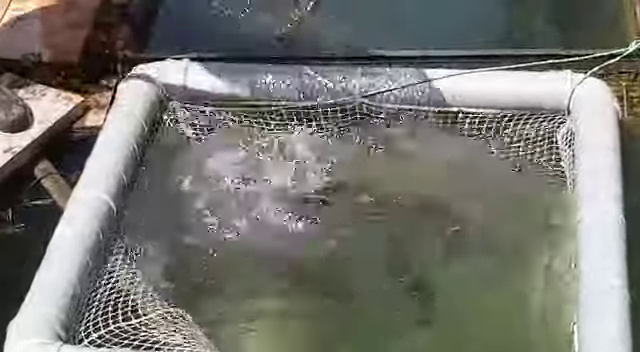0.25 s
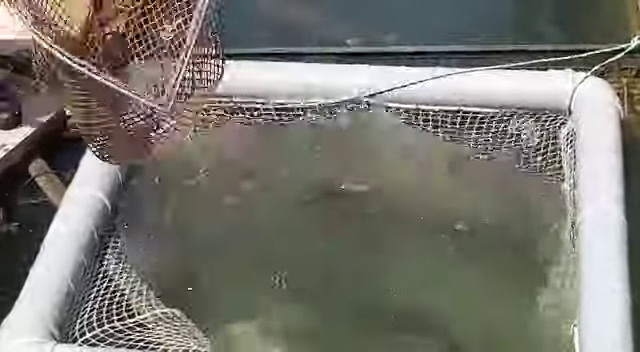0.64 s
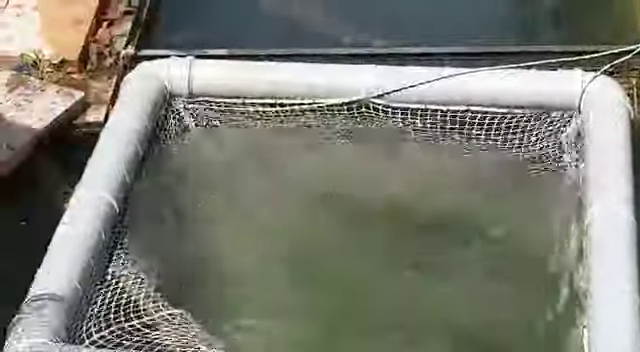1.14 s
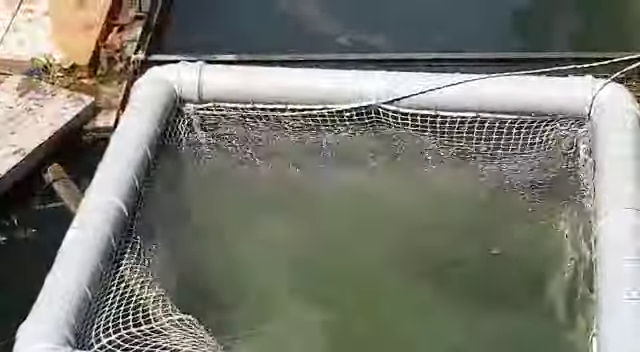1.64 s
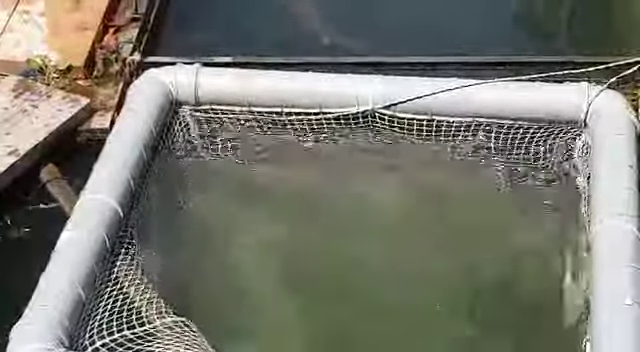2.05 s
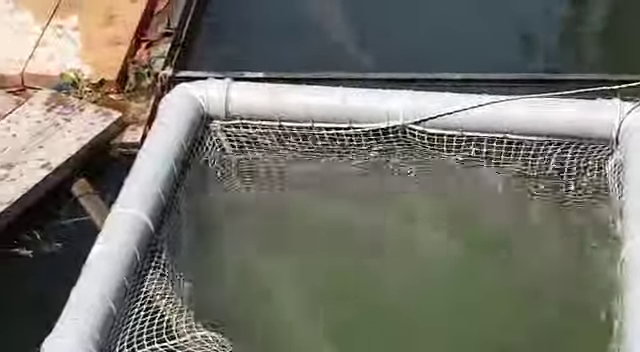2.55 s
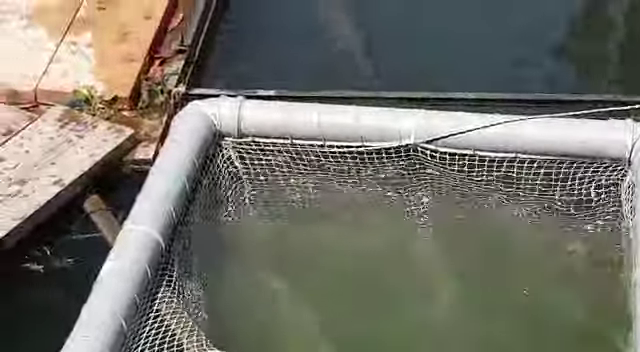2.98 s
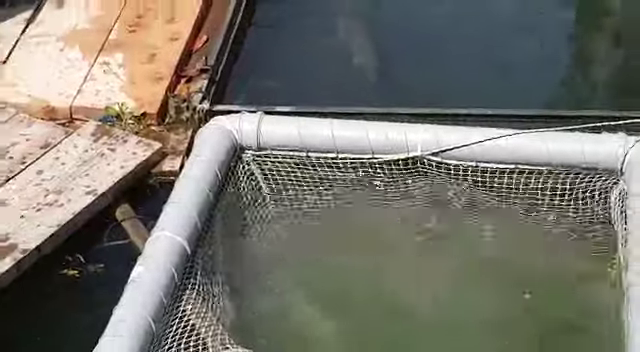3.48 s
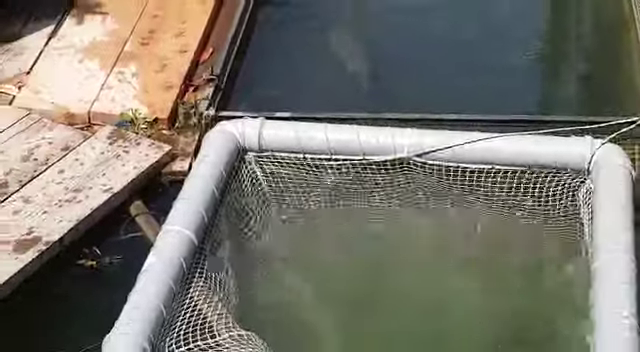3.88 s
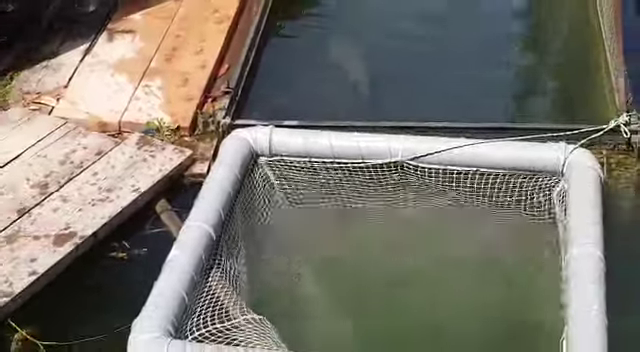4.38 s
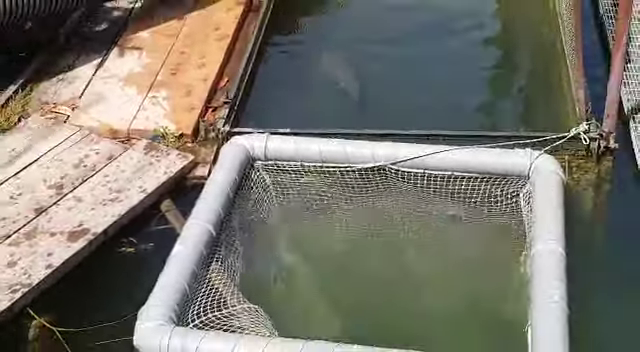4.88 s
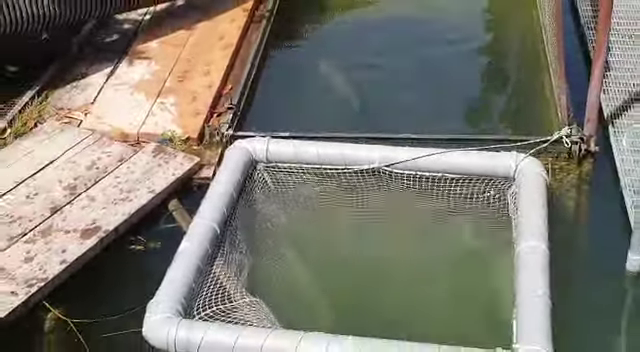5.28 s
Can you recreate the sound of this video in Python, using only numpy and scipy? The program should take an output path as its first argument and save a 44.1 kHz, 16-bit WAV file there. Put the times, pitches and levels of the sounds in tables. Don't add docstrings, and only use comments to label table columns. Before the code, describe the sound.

Fish splash heavily into pond water with bubbles and spray, then plank steps, a hard wooden knock, wet net ticks and faint bird whistles.

```python
import sys
import numpy as np
from scipy import signal
from scipy.fft import rfft, irfft, next_fast_len
from scipy.io import wavfile
from scipy.ndimage import uniform_filter1d

SR = 44100
rng = np.random.default_rng(int(sys.argv[2]) if len(sys.argv) > 2 else 0)


def materialize(psi):
    bounded = np.clip(np.atleast_2d(psi).T, -1, 1)
    quanta = np.round(bounded * 32767).astype(np.int16)
    wavfile.write(sys.argv[1], SR, quanta)


def gain_from_db(level_db):
    decades = np.asarray(level_db, float) / 20
    return 10 ** decades


N = 243617

# start in seconds, peak in dB, treble spray above that peak in dB.
PLUNGES = [
    (0.045, -43.5, 5),
    (0.192, -39, 10),
    (0.534, -54, 10),
]
# frequency in Hz, density in dB per Hz.
WATER_TONE = [(120, -13), (200, -0.5), (352, -5.5), (730, -13.5), (1430, -4.5), (1630, -8), (2550, -2.5),
              (5940, -4.5), (7000, -10), (9100, -54), (15400, -120)]
# frequency in Hz, density in dB per Hz.
SPRAY_TONE = [(6000, -47), (7200, -14), (9800, -7.5), (13000, -4), (16300, -13.5)]
# start in seconds, peak in dB, pitch in Hz, cycles to
BUBBLES = [(.034, -32, 580, 3.8, 1.5), (.043, -28, 830, 2.4, 0.67), (0.049, -35, 1436, 10.4, 1.06),
           (0.079, -31.5, 6000, 17, 0.93), (.183, -34, 3600, 13, 1.14), (0.1897, -24, 884, 3.9, 0.55),
           (0.2, -38, 2510, 34, 1.1), (0.218, -34, 1150, 9.1, 0.89), (0.221, -37.5, 2950, 15, 0.99),
           (.274, -40, 725, 4.8, 0.73), (0.297, -46, 1070, 16, 1.1), (0.316, -46, 1130, 8, 1.2),
           (0.334, -51, 3720, 31, 1.1), (0.423, -48.5, 1023, 8.7, 1.23), (0.13, -44, 705, 9.4, 0.68),
           (0.534, -39.5, 4000, 20, 0.67), (1.19, -58.5, 1126, 19, 0.82), (1.98, -47.5, 1090, 7.4, 3),
           (2.219, -49.5, 1024, 12, 1.3), (4.205, -41, 2720, 7.8, 0.52),
           (.028, -44, 1000, 5, 1.1), (.092, -41, 2600, 10, 1), (.183, -38, 5800, 12, 1),
            (.205, -41, 1400, 6, 1), (.24, -44, 900, 6, 1.2), (.255, -43, 1100, 8, 1.1),
            (.283, -45, 1250, 6, 1.1), (.355, -50, 676, 6, .9), (.05, -43, 640, 6, 1),
            (.165, -47, 520, 8, 1), (.2, -42, 560, 6, 1), (.245, -48, 600, 5, 1), (.26, -45, 700, 5, 1),
            (.325, -51, 680, 9, 1), (.495, -51, 1100, 8, 1)]
# start in seconds, peak in dB, main ring in Hz, T60 in seconds.
STEPS = [(0.622, -52, 245, 0.11), (0.704, -41, 242, 0.066), (1.296, -34.5, 175, 0.039),
         (1.368, -34.5, 172, 0.046), (1.446, -43, 305, 0.044), (1.837, -30, 225, 0.022),
         (2.158, -48, 399, 0.074), (2.383, -35.5, 242, 0.081), (2.751, -46.5, 113, 0.065),
         (2.848, -54.5, 349, 0.085), (3.29, -40, 224.6, 0.062), (3.33, -42.5, 170, 0.052),
         (3.963, -62, 330, 0.12), (3.996, -46, 289, 0.034), (4.288, -51, 193, 0.081),
         (4.62, -58, 164, 0.092), (4.057, -45.5, 233, 0.071), (3.515, -52, 117, 0.066),
         (3.713, -56, 111, .06), (5.481, -55, 177, 0.03)]
# ratio to the main ring, level in dB.
PLANK_MODES = [(1, 5.5), (1.5, 1.5), (2.3, -2), (3.6, -3), (5.2, -9), (7., -8)]
# start in seconds, peak in dB, ring in Hz,
# T60 in seconds.
FLOATS = [
    (.622, -42.5, 657, 0.084),
    (3.955, -47.5, 325, 0.19),
    (3.998, -47.5, 823, 0.037),
    (4.125, -36, 78, .16),
    (4.236, -33, 75, 0.14),
]
# frequency in Hz, level in dB, T60 in seconds.
KNOCK_MODES = [(68.6, -15, 0.33), (124, -5.5, 0.13), (158, 8, 0.063), (203.7, 10, 0.053), (236, -2.5, 0.25),
               (251, -1, 0.12), (293.4, -12.5, 0.23), (325, -22, 0.28), (380, -37, 0.041), (516, -26, 0.2),
               (738, -21, 0.16), (1046, -36, 0.2)]
# frequency in Hz, density in dB per Hz.
RATTLE_TONE = [(350, 14.5), (600, -2), (1200, 1), (2400, -0.5), (3500, -15.5)]
# frequency in Hz, peak in dB, T60 in seconds, rise in seconds.
THUMP_MODES = [(59.7, -24, 0.13, 0.05), (52.4, -42, 0.35, 0.087), (109.3, -56.5, 0.36, 0.0054),
               (161, -48.5, 0.064, 0.011), (240, -48.5, 0.073, 0.0107), (390, -53.5, 0.032, 0.0026)]
# start in seconds, # length in
# seconds, peak in dB, dull part above that peak in dB, place of the peak from 0 to 1.
SCUFFS = [(0.878, 0.076, -66.5, 3.5, 0.9), (1.31, 0.11, -75.5, 15.5, 0.33), (1.457, 0.077, -60, -3.5, 0.9),
          (1.764, 0.25, -49.5, -5, 0.49), (1.993, 0.075, -46, -8, 0.34), (2.253, 0.22, -49, -2, 0),
          (3.043, 0.57, -67, -15, 0), (3.398, 0.051, -57.5, 0, 0.43), (3.433, 0.064, -52.5, -24, 0.26),
          (3.492, 0.072, -61, -11, .4), (4.51, 0.041, -61, -19, 0.3), (3.82, 0.012, -75, -27, .4),
          (0.521, 0.025, -40.5, -29, 0.3), (3.553, 0.093, -61.5, -4, 0.15), (3.738, 0.036, -63, 1.5, 0.46),
          (3.978, 0.24, -67, -2, 0.13), (4.197, 0.15, -60, -4, 0), (4.386, 0.046, -59, -15, 0.6),
          (4.422, 0.1, -51.5, -17.5, 0.2), (4.62, 0.028, -61, -34, 0.3), (4.853, 0.17, -61, -5.5, 0),
          (5.391, 0.34, -63.5, -1.5, 0)]
# frequency in Hz, density in dB per Hz.
BRIGHT_TONE = [(3530, -27), (6000, -15), (8100, -10.5), (9760, -7.5), (10700, -11.5), (12000, -6.5),
               (16000, -7), (16300, -36), (16500, -67)]
# frequency in Hz, density in dB per Hz.
DULL_TONE = [(410, -2), (700, -3.5), (945, -14.5), (1050, -6.5), (1470, -12.5), (2290, -3), (6430, -10.5),
             (7610, -29.5), (12300, -24), (15800, -37)]
# start in seconds, length in seconds, peak in dB, centre in Hz, width in Hz.
SQUEALS = [(2.275, .075, -52, 2150, 600), (3.88, .22, -73, 2700, 700), (4.395, .025, -55, 12500, 2500),
           (4.405, .02, -57, 9300, 1000), (4.43, .065, -47.5, 12100, 1100), (4.432, .06, -52, 14000, 1500),
           (4.43, .06, -54, 9900, 900), (4.43, .07, -70, 2400, 800), (4.853, .075, -56, 9500, 1300),
           (4.853, .095, -55, 12800, 3500), (4.86, .06, -67, 2500, 900), (5.3, .2, -72, 2400, 1000)]
# start in seconds, #
# peak in dB, centre in Hz, T60 in seconds.
CRACKS = [(0.0397, -20, 4120, 0.023), (0.0712, -35, 5940, 0.12), (0.1759, -28.5, 3770, 0.063),
          (0.4044, -36, 6350, 0.034), (0.5554, -53, 6350, 0.025), (0.9496, -43.5, 4900, 0.092),
          (1.209, -36, 6400, 0.029), (1.3433, -36.5, 6260, 0.018), (2.2415, -24, 6260, 0.065),
          (3.3237, -35.5, 7400, 0.02), (3.4165, -39, 2440, 0.052), (3.5497, -43, 5430, 0.076),
          (3.698, -50.5, 4080, 0.059), (3.9753, -35, 9800, 0.034), (4.2032, -34, 10000, 0.035),
          (4.3519, -46.5, 11200, 0.034), (4.514, -50, 9000, 0.051), (4.6827, -41.5, 7060, 0.039),
          (5.2095, -33, 5950, 0.011), (5.3207, -49, 5700, 0.051), (5.399, -38, 10200, 0.059),
          (5.4988, -30, 9400, 0.017)]
# start in seconds, # peak
# in dB, ring in Hz, T60 in seconds.
PINGS = [(0.0834, -27, 10700, 0.078), (0.4942, -31.5, 5100, 0.02), (0.5835, -30, 5250, 0.0097),
         (0.6132, -30.5, 6250, 0.0085), (0.7521, -38.5, 5050, 0.018), (1.3685, -47, 5750, 0.016),
         (1.6101, -41, 12100, 0.03), (2.2394, -17.5, 12300, 0.025), (2.388, -23.5, 11200, 0.012),
         (3.0469, -41, 10200, 0.022), (3.058, -47, 11100, 0.023), (3.0888, -49, 11800, 0.036),
         (3.225, -46, 10100, 0.033), (3.647, -50, 4470, 0.036), (3.7627, -43, 6000, 0.033),
         (3.865, -52, 9900, 0.036), (4.0544, -46, 13000, 0.037), (4.1359, -43.5, 11800, 0.037),
         (4.1559, -48, 11700, 0.037), (4.192, -44, 10800, .03), (4.3968, -38, 13900, 0.036),
         (4.435, -44, 12000, .03), (4.7775, -51.5, 9500, 0.044), (4.8583, -37, 10500, 0.023),
         (5.1935, -50.5, 4020, 0.046)]
# start in seconds, peak in dB, centre in Hz, T60 in seconds.
BEADS = [(.109, -36, 4500, 0.022), (.6993, -47, 3840, .02), (.925, -46, 4800, 0.026),
         (1.3, -49, 5260, 0.025), (1.3185, -49, 4730, 0.018), (1.6277, -42, 13000, .02),
         (1.8512, -34.5, 5900, 0.024), (1.8612, -34.5, 4200, 0.038), (2.3885, -34.5, 3020, 0.022),
         (2.635, -62, 11500, .015), (2.661, -57, 10700, 0.013), (2.7337, -60, 5000, .02),
         (2.7531, -65, 7500, 0.011), (2.77, -58, 6500, .015), (3.048, -62, 5500, .02),
         (3.147, -51, 6260, .015), (3.255, -54, 11700, .02), (3.3245, -43, 2880, 0.02),
         (3.467, -39.5, 10300, .03), (3.484, -43.5, 6900, 0.029), (3.7279, -48, 8400, 0.036),
         (3.7434, -51, 11000, .03), (3.8741, -55, 10000, .02), (3.9559, -50, 11000, .02),
         (4.0632, -53, 11500, 0.018), (4.2782, -54, 7000, .03), (4.7411, -51, 8500, .02),
         (4.905, -52, 11500, .03), (5.3592, -57, 5800, .03), (5.472, -63, 3000, .03)]
# start in seconds, peak in dB, ring in Hz, T60 in seconds.
PLINKS = [(.1135, -40, 6100, .02), (.405, -47, 6100, .02), (.5247, -23.5, 6770, .012),
          (.5268, -29, 6900, .01), (.5282, -34, 11800, .008), (.5322, -34, 7000, .01),
          (.5557, -38, 6500, .007), (.5559, -41, 3900, .01), (.597, -48, 3100, .025), (.67, -54, 5750, .09),
          (1.3703, -41, 5900, .012), (2.2401, -21, 12300, .006), (2.2404, -24, 15000, .005),
          (2.2428, -21, 6200, .009), (2.389, -33, 8200, .012), (2.557, -62, 4500, .02),
          (2.7535, -49, 7500, .004), (3.163, -60, 4450, .02), (3.4125, -51, 2440, .05),
          (3.7635, -42, 5800, .01), (3.7665, -54, 4900, .015), (3.977, -44, 5800, .02),
          (4.6835, -49, 5820, .015), (5.2101, -45, 6090, .012)]
# start in seconds, length in seconds, first pitch in Hz,
# last pitch in Hz, level in dB.
SLURS = [(1.03, .095, 4350, 2420, -58.5), (1.572, .045, 3620, 3330, -58), (1.62, .06, 2900, 2700, -68),
         (1.685, .08, 4450, 3250, -66), (2.115, .065, 2600, 3650, -56), (2.185, .055, 3600, 2750, -61),
         (2.15, .07, 4100, 3750, -69), (2.13, .08, 2750, 2700, -69), (.84, .035, 2850, 2300, -67),
         (2.565, .125, 3550, 2250, -65), (2.625, .07, 3100, 2550, -71), (2.832, .14, 2850, 2720, -71),
         (3.01, .09, 2900, 2400, -70), (2.95, .07, 3950, 3300, -75), (2.12, .06, 2100, 2220, -69.5)]
# start in seconds, length in seconds, middle pitch in Hz,
# ends above the middle as a share, level in dB.
BOWS = [(.925, .08, 2220, .02, -63), (1.19, .11, 3310, .15, -55), (1.4, .09, 2990, .11, -57),
        (1.745, .075, 3200, .03, -58), (1.957, .06, 3420, .02, -50.5), (2.02, .035, 3380, 0, -66),
        (2.41, .125, 3480, 0, -64.5), (2.41, .08, 2960, 0, -60.5), (2.575, .11, 3520, -.03, -70),
        (2.48, .08, 4300, 0, -77), (2.74, .05, 4280, 0, -78), (.815, .03, 2150, 0, -73),
        (.87, .03, 3550, 0, -69), (4.685, .04, 4950, 0, -71), (5.055, .045, 4170, 0, -76),
        (2.92, .07, 6750, 0, -73)]
# frequency in Hz, density in dB per Hz.
AIR_TONE = [(120, -26), (200, -6.5), (354, -7.5), (542, -8.5), (594, -7), (715, -10.5), (2050, -17.5),
            (2800, -13.5), (3310, -16), (4210, -18.5), (4530, -20.5), (5980, -17.5), (7320, -23.5),
            (10800, -18.5), (16500, -15)]
# frequency in Hz, density in dB per Hz.
RUMBLE_TONE = [(15, -97), (25, -71), (51, -2), (86, -3.5), (108, -4.5), (135, -15), (214, -17),
               (249, -28.5), (349, -22.5), (487, -34.5), (700, -23.5), (910, -52), (1540, -120)]
# time in seconds, swell in dB.
SWAYS = [(0.14, 10.5), (0.93, 4), (1.35, 6), (1.89, 7.5), (2.34, 6.5), (4.7, 0.5), (5.3, 3.8), (3.4, 4),
         (0.6, 3.5)]
# frequency in Hz, gain in dB.
SHELTER = [(1500, 1), (2600, 1.5), (3400, -5.5), (4500, -3.5), (6300, 1), (16000, -3.5)]
# frequency in Hz, likeness from 0 to 1.
PORT_LIKENESS = [(60, 0.98), (300, 1), (700, 0.03), (1500, 0.37), (4000, 0.024), (15000, 0.037)]
# frequency in Hz, T60 in seconds.
BANK_T60 = [(100, 0.54), (1000, 0.42), (4000, 0.57), (15000, 0.076)]
# frequency in Hz, left minus right in dB.
PORT_TILT = [(60, 1.5), (120, 1), (240, 0.5), (480, 0.5), (950, 2.5), (1890, -3.5), (3770, -6),
             (7520, -7.5), (15000, -5.5)]
# frequency in Hz, gain in dB.
HOUSING = [(1200, 1), (2500, 0), (4000, 2), (6300, 3), (7900, 0), (11500, 2), (15500, -5)]

EARLY_S = 0.000429
CHURN_DB, CHURN_SAG_DB_PER_S, CHURN_SPRAY_DB = -50.5, 13, 7.5
CHURN_END_S, CHURN_FADE_S = 0.64, 0.39
PLUNGE_RISE_S, PLUNGE_T60_S, SPRAY_T60_S = 0.023, 0.22, 0.19
STEP_RISE_S, FLOAT_RISE_CYCLES = 0.004, 2.9
KNOCK_S, KNOCK_DB, KNOCK_RISE_S, THUMP_S = 2.2414, -5, 0.0062, 4.0642
STROKE_START_DB, STROKE_END_DB, GRIP_S = -11, -17, 0.004
RUSTLE_SHARED = 0.097
SONG_DB, SLUR_FADE_DB, BOW_FADE_DB = 1.5, -5, -4
SETTLE, BOW_DIP = 1.6, 0.42
RETREAT_S = 2.1, 2.8, 4.7
AIR_DB = -59, -63, -65
RUMBLE_CALM_DB, SWAY_S = -62, 0.12


def evened(x):
    return x / np.sqrt(np.mean(x ** 2) + 1e-20)


def read(points, hz):
    f, value = np.transpose(points)
    return np.interp(np.log(hz + 1), np.log(f + 1), value)


def along_time():
    return np.arange(N) / SR


def add(mix, s, sound):
    part = mix[round(s * SR):][:len(sound)]
    part += sound[:len(part)]


def colour(x, points):
    size = next_fast_len(len(x))
    hz = np.fft.rfftfreq(size, 1 / SR)
    inside = (hz > points[0][0]) & (hz < points[-1][0])
    shaped = rfft(x, size) * gain_from_db(read(points, hz)) * inside
    return evened(irfft(shaped, size)[:len(x)])


def grit(per_s, spread_db, smooth):
    size = gain_from_db(spread_db * np.minimum(rng.exponential(1, N), 4)) * rng.standard_normal(N)
    clicks = size * (rng.random(N) < per_s / SR)
    return evened(clicks) + smooth * rng.standard_normal(N)


def ring(hz, t60, rise_s, glide=0.93):
    t = np.arange(round(1.8 * t60 * SR) + 64) / SR
    turns = np.cumsum(hz * glide ** np.minimum(t / t60, 1)) / SR
    rise = np.sin(np.pi / 2 * np.minimum(t / rise_s, 1)) ** 2
    return rise * gain_from_db(-60 * t / t60) * np.sin(2 * np.pi * turns)


def resonance(noise, hz, q):
    peak = signal.iirpeak(hz, q, SR)
    return evened(signal.lfilter(*peak, signal.lfilter(*peak, noise)))


def churning():
    t = along_time()
    fade = np.clip(1 - (t - CHURN_END_S) / CHURN_FADE_S, 0, 1) ** 2
    body = gain_from_db(CHURN_DB - CHURN_SAG_DB_PER_S * t) * fade
    spray = body * gain_from_db(CHURN_SPRAY_DB) * (t < CHURN_END_S)
    for s, db, spray_db in PLUNGES:
        rise = np.clip(1 + (t - s) / PLUNGE_RISE_S, 0, 1) ** 2
        since = np.maximum(t - s, 0)
        body = body + rise * gain_from_db(db - 60 * since / PLUNGE_T60_S)
        spray = spray + rise * gain_from_db(db + spray_db - 60 * since / SPRAY_T60_S)
    return body, spray


def splash():
    body, spray = churning()
    swarm = 0.6 * grit(per_s=3000, spread_db=2, smooth=1.5)
    for hz in np.geomspace(500, 6500, num=12):
        births = grit(per_s=hz * 0.12, spread_db=3, smooth=0)
        bubble = ring(hz, 20 / hz, 3 / hz, glide=1.2)
        swarm += 0.3 * evened(signal.oaconvolve(births, bubble)[:N])
    out = colour(swarm, WATER_TONE) * body * gain_from_db(-0.5)
    mist = grit(per_s=7200, spread_db=7, smooth=0.68)
    out += colour(mist, SPRAY_TONE) * spray * gain_from_db(-7.5)
    for s, db, hz, cycles, glide in BUBBLES:
        add(out, s, gain_from_db(db + 7) * ring(hz, 3 * cycles / hz, 0.35 * cycles / hz, glide))
    return out


def planks():
    out = np.zeros(N)
    for s, db, hz, t60 in STEPS:
        for ratio, mode_db in PLANK_MODES:
            mode_hz = hz * ratio * rng.uniform(0.824, 1.17)
            add(out, s, gain_from_db(db + mode_db - 1.5) * ring(mode_hz, t60 / ratio ** 0.34, STEP_RISE_S))
    for s, db, hz, t60 in FLOATS:
        add(out, s, gain_from_db(db) * ring(hz, t60, FLOAT_RISE_CYCLES / hz))
    for hz, db, t60 in KNOCK_MODES:
        add(out, KNOCK_S, gain_from_db(KNOCK_DB + db - 9.5) * ring(hz, t60, KNOCK_RISE_S))
    t = np.arange(8000) / SR
    rattle = colour(rng.standard_normal(len(t)), RATTLE_TONE)
    add(out, KNOCK_S - 0.002, rattle * gain_from_db(KNOCK_DB - 27 - 60 * t / 0.31))
    for hz, db, t60, rise_s in THUMP_MODES:
        add(out, THUMP_S, -gain_from_db(db + 12) * ring(hz, t60, rise_s))
    return out


def strokes():
    press = np.zeros((2, N))
    for s, length, db, dull_db, place in SCUFFS:
        t = np.arange(round(length * SR)) / SR
        marks = length * np.array([0, np.clip(place, 0.02, 0.98), 1])
        press_db = db + np.interp(t, marks, [STROKE_START_DB, 0, STROKE_END_DB])
        grip = np.clip(np.minimum(t, length - t) / GRIP_S, 0, 1)
        on = grip * gain_from_db(press_db)
        add(press[0], s, on)
        add(press[1], s, on * gain_from_db(dull_db))
    return press


def scuffs(press):
    bright = colour(grit(per_s=19000, spread_db=9.5, smooth=0.78), BRIGHT_TONE)
    dull = colour(grit(per_s=3000, spread_db=3.5, smooth=0.7), DULL_TONE)
    return press[0] * bright + press[1] * dull


def squeals():
    out = np.zeros(N)
    for s, length, db, hz, width in SQUEALS:
        band = resonance(rng.standard_normal(round(length * SR)), hz, hz / width)
        add(out, s, gain_from_db(db) * band * signal.windows.tukey(len(band), 0.45))
    return out


def ticks(rows, share):
    t, out = np.arange(6000) / SR, np.zeros(N)
    rise = np.minimum(t / 0.0004, 1)
    for s, db, hz, t60 in rows:
        noise = rng.standard_normal(len(t))
        band = resonance(noise, hz, 3.5)
        broad = evened(signal.lfilter(*signal.butter(2, 0.5 * hz, "high", fs=SR), noise))
        crack = (1 - share) * broad + share * band
        fall = 0.78 * gain_from_db(-300 * t / t60) + 0.68 * gain_from_db(-60 * t / t60)
        fall += 0.047 * gain_from_db(-15 * t / t60)
        add(out, s + 0.001013, 0.53 * crack * gain_from_db(db) * fall * rise)
    return out


def plinks():
    out = np.zeros(N)
    for s, db, hz, t60 in PLINKS:
        add(out, s, gain_from_db(db + 3) * ring(hz, t60, 0.0005, glide=1.01))
    return out


def drips():
    beads = colour(grit(per_s=92, spread_db=-34, smooth=0), SPRAY_TONE)
    t = np.arange(400) / SR
    burst = rng.standard_normal(len(t)) * gain_from_db(-60 * t / 0.0039)
    return gain_from_db(-83) * evened(signal.oaconvolve(beads, burst)[:N])


def whistle(hz, db):
    flutter, twinkle = uniform_filter1d(rng.standard_normal((2, len(hz))), size=250, axis=1)
    pitch = hz * (1 + 0.009 * evened(flutter))
    tone = np.sin(2 * np.pi * np.cumsum(pitch) / SR) * signal.windows.tukey(len(hz), 0.3)
    return gain_from_db(SONG_DB + db + 1.8 * evened(twinkle)) * tone


def birds():
    out = np.zeros(N)
    for s, length, first_hz, last_hz, db in SLURS:
        u = np.linspace(0, 1, round(length * SR))
        pitch = last_hz + (first_hz - last_hz) * (1 - u) ** SETTLE
        add(out, s, whistle(pitch, db + SLUR_FADE_DB * (2 * u - 1) ** 2))
    for s, length, hz, bend, db in BOWS:
        u = np.linspace(0, 1, round(length * SR))
        pitch = hz * (1 + bend * ((u - BOW_DIP) / (1 - BOW_DIP)) ** 2)
        add(out, s, whistle(pitch, db + BOW_FADE_DB * (u - 0.5)))
    return out


def field(points, patchy_db, size):
    hop = size // 4
    frames, hz = N // hop + 5, np.fft.rfftfreq(size, 1 / SR)
    a, b, c, d, patches = rng.standard_normal((frames, len(hz), 5)).T
    patches = uniform_filter1d(patches, size=9, axis=0)
    patches = evened(uniform_filter1d(patches, size=12, axis=1))
    same = np.clip(read(PORT_LIKENESS, hz), 0, 1)[:, None]
    early = np.exp(2j * np.pi * hz * EARLY_S)[:, None]
    right = a + 1j * b
    left = same * early * right + np.sqrt(1 - same ** 2) * (c + 1j * d)
    z = np.array([left, right]) * gain_from_db(read(points, hz)[:, None] + patchy_db * patches)
    retreat = np.interp(np.arange(frames) * hop / SR, RETREAT_S[1:], [0.3, 1])
    z *= gain_from_db(read(SHELTER, hz)[:, None] * retreat)
    return evened(signal.istft(z, nperseg=size, noverlap=size - hop)[1][:, :N])


def background():
    t = along_time()
    air_db = np.interp(t, RETREAT_S, AIR_DB)
    rumble_db = RUMBLE_CALM_DB + sum(db * np.exp(-((t - s) / SWAY_S) ** 2) for s, db in SWAYS)
    air = gain_from_db(air_db + 2) * field(AIR_TONE, patchy_db=1.8, size=512)
    return air + gain_from_db(rumble_db + 6) * field(RUMBLE_TONE, patchy_db=1.5, size=2048)


def ports(x, early_s):
    size = next_fast_len(N)
    early = np.exp(2j * np.pi * np.fft.rfftfreq(size, 1 / SR) * early_s)
    return np.array([irfft(rfft(x, size) * early, size)[:N], x])


def scatter(x, stretch):
    taps = np.zeros((2, SR // 2))
    at = np.arange(100, 22000, 20) + rng.integers(0, 20, (2, 1095))
    np.put_along_axis(taps, at, rng.choice([-1., 1.], at.shape), 1)
    hz, t, z = signal.stft(taps, SR, nperseg=256)
    t60 = stretch * read(BANK_T60, hz)[:, None]
    tail = signal.istft(z * gain_from_db(-60 * t / t60), SR, nperseg=256)[1]
    tail += signal.lfilter(*signal.butter(2, 1600, fs=SR), tail[::-1])
    return signal.fftconvolve(x[None], tail / np.linalg.norm(tail[0]), axes=1)[:, :N]


def scene():
    water, low, far, press = splash(), planks(), birds(), strokes()
    drag, aside = scuffs(press), scuffs(press)
    snaps = drips() + squeals()
    snaps += ticks(CRACKS, share=0.17) + ticks(PINGS, share=0.6) + ticks(BEADS, share=0.85)
    rings = plinks()
    near = ports(RUSTLE_SHARED * drag + snaps + rings, EARLY_S)
    near += np.sqrt(1 - RUSTLE_SHARED ** 2) * np.array([aside, drag])
    direct = near + ports(water, 0.00005) + ports(far, EARLY_S) + ports(low, 0.00028)
    sent = water + drag + 1.88 * snaps + 0.35 * rings + 0.63 * low + 1.33 * far
    wet = gain_from_db(-9.5) * scatter(sent, stretch=0.63)
    close = gain_from_db(-9) * far + gain_from_db(-3.5) * drag + gain_from_db(-10) * snaps + gain_from_db(-17) * rings
    return direct + wet + scatter(close, stretch=0.28) + background()


def top_cut(x):
    return signal.sosfilt(signal.butter(12, 16940, fs=SR, output="sos"), x)


def record(dry):
    size = next_fast_len(N)
    hz = np.fft.rfftfreq(size, 1 / SR)
    half_db = read(PORT_TILT, hz) / 2
    low_cut = 1 / (1 + (39 / (hz + 1)) ** 4)
    high_cut = np.clip((16000 - hz) / 200, 0.0002, 1)
    port_gain = gain_from_db(read(HOUSING, hz) + [half_db, -half_db])
    shaded = irfft(rfft(dry, size) * low_cut * high_cut * port_gain, size)[:, :N]
    return top_cut(shaded)


dry = scene()
out = record(dry)
materialize(out)
```